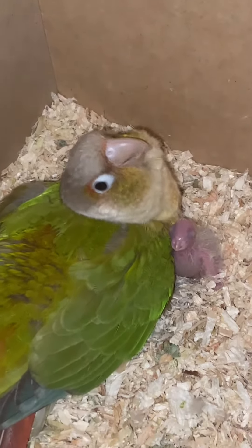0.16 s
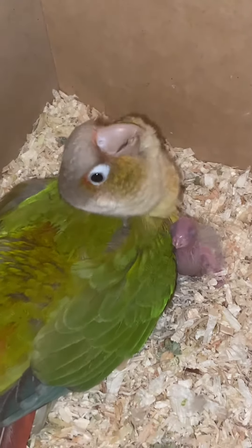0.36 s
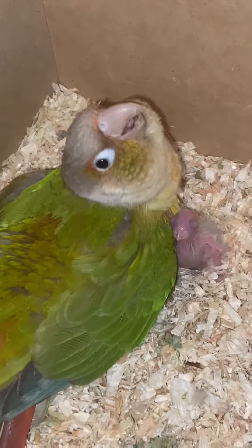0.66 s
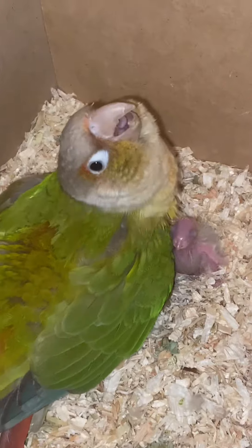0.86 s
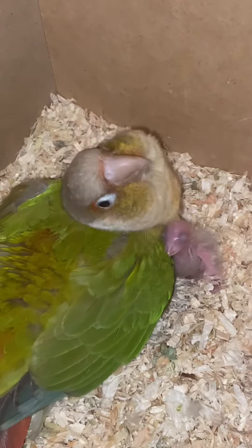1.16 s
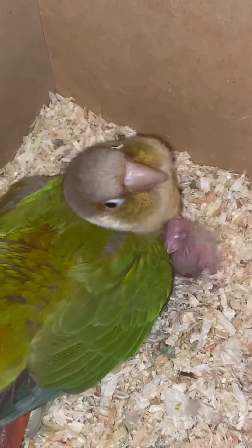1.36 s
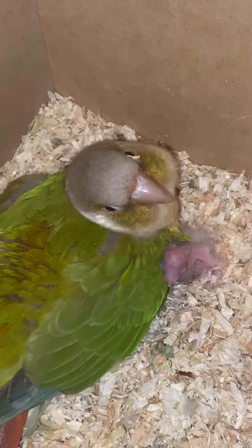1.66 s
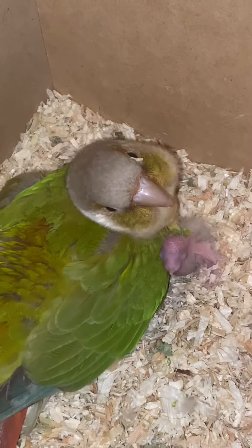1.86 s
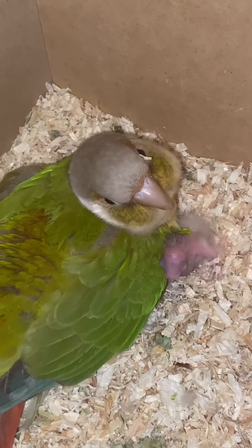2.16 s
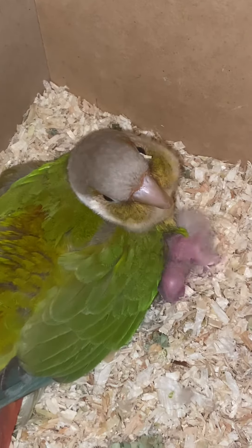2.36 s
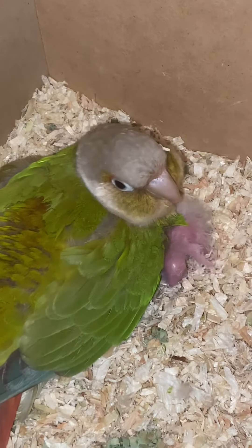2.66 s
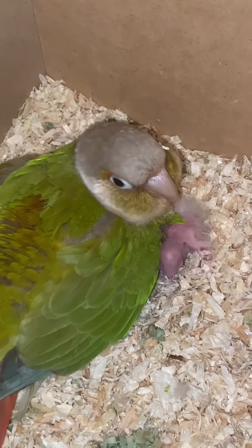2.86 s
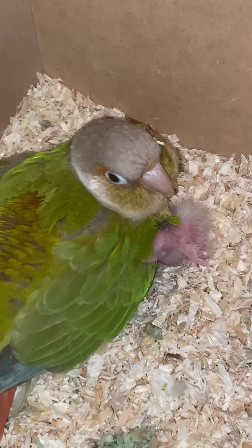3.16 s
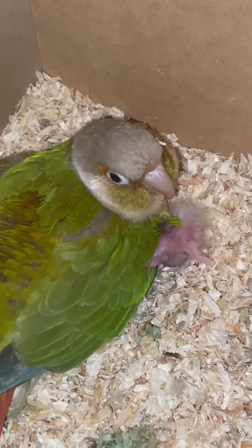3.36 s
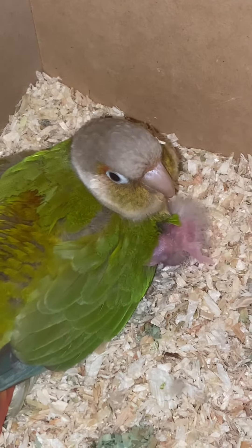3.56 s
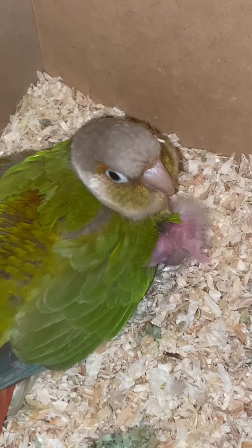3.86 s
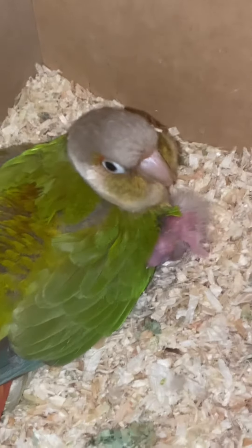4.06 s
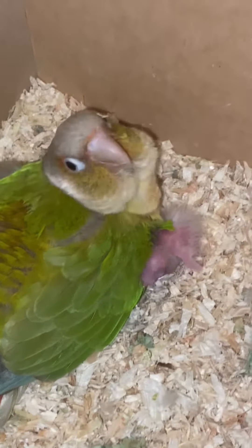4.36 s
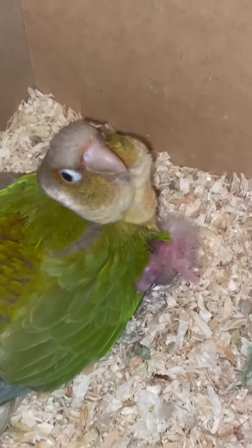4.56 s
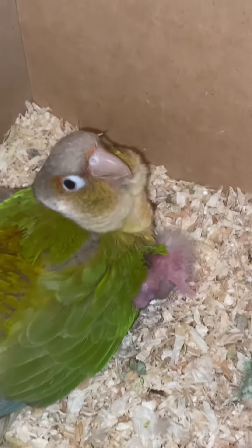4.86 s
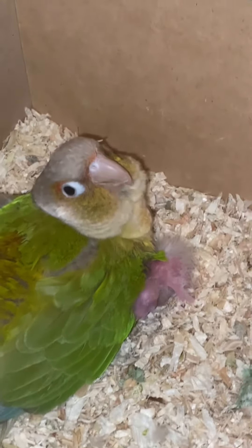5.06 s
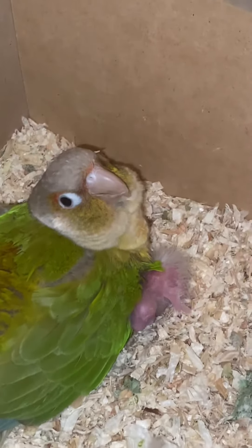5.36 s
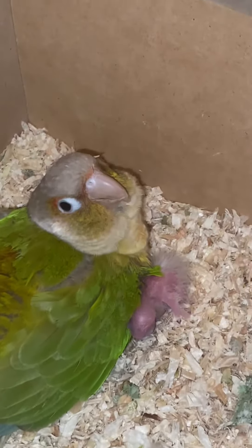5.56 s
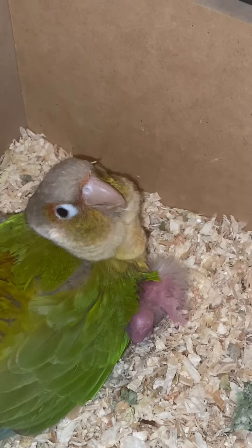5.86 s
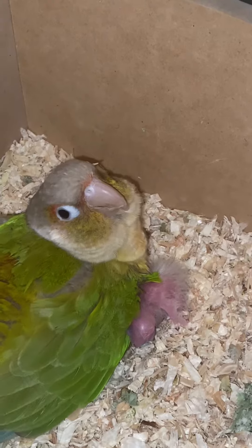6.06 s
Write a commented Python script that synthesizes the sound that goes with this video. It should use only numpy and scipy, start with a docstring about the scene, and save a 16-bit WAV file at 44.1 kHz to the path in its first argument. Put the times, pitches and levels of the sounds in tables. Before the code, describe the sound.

A newly hatched parrot chick gives six short, sharp, raspy peeps about a second apart in a wooden nest box, over faint low rumble.

```python
"""Over a low room rumble a newly hatched parrot chick peeps at once, close and loud, in a wooden nest box;
a second one, muffled under the parent, joins in. Each near peep creaks on, rasps, locks into a whistle and falls.
Noise rustles as shavings, impulses tick in them and ring the wood of the box, and a rattle drives distant metal.
Peeps are whistles with side lines at fractions of their pitch, which double the period or blur into a rasp."""
import sys
import numpy as np
from scipy import signal
from scipy.fft import rfft, irfft
from scipy.io import wavfile
from scipy.ndimage import uniform_filter1d

SR = 44100
rng = np.random.default_rng(int(sys.argv[2]) if len(sys.argv) > 2 else 0)


def dump(signal):
    """Clip the signal to [-1, 1] and save it as 16-bit WAV at the path in sys.argv[1]."""
    limited = np.clip(np.atleast_2d(signal).T, -1, 1)
    pcm = np.round(limited * 32767).astype(np.int16)
    wavfile.write(sys.argv[1], SR, pcm)


def level_to_linear(level):
    """Convert decibel levels to linear amplitude factors, elementwise."""
    exponent = np.asarray(level, float) / 20
    return 10 ** exponent


N = 274302   # samples

# Steady hiss, spectral shape: [f/Hz, relative density/dB]
HISS_SPECTRUM = [(60, -20.5), (130, 1.5), (232, -12.5), (390, -9.5), (550, -18.5), (934, -22), (6000, -36),
                 (16000, -43.5)]
HISS_DB, SIDE_HISS_DB = -73.5, -81   # rms
# Room rumble, before its uneven swell: [t/s, level/dB]
RUMBLE_LEVEL = [(0, -62), (.75, -57.5), (1.1, -63.5), (2.3, -62), (3.1, -69.5), (3.6, -54.5), (4.6, -54),
                (4.85, -42.5), (5.1, -61), (6.22, -69)]

# Distant metal being struck: [t/s, bright drive level/dB, rattle length/s, deep drive level/dB]
CLANKS = [(3.376, -57, 0.0732, -44), (4.121, -45.5, 0.021, -38)]
# Bright modes of the metal: [f/Hz, relative level/dB, t60/s]
METAL_MODES = [(1155, -12, .4), (1700, -4, .2), (1862, 0, .22), (2055, 0, .3), (2290, -3, .8),
               (2600, -7, .15), (3500, -12, .03)]
# Low modes of the same object: [f/Hz, relative level/dB, t60/s]
DEEP_MODES = [(272, -6, .3), (313, 0, .5), (388, -2, .5)]

# Dull knocks on the wood of the box: [t/s, blow level/dB, f/Hz, resonance width/Hz]
KNOCKS = [(0.301, -57, 111.2, 90), (2.206, -60, 410, 200), (4.010, -46, 556, 251.4),
          (4.012, -49.5, 191, 109), (4.036, -43, 99, 110)]
# Rustle of the shavings, spectral shape: [f/Hz, relative density/dB]
RUSTLE_SPECTRUM = [(1000, -8.5), (5000, -2.5), (11000, -5), (16000, -11)]
RUSTLE_DB = -87   # rms, before the box adds its echoes
# Scuffs in the shavings and on the box: [t/s, level/dB, length scale/s, top f/Hz, thump level/dB]
SCUFFS = [(0.293, -60.5, 0.026, 1650, -58), (0.476, -69, 0.072, 1190, -84),
          (1.32, -80.5, 0.21, 9700, -79.5), (1.587, -65.5, 0.012, 675, -63), (1.799, -65, 0.07, 1940, -85),
          (2.134, -75, 0.226, 12000, -80), (2.213, -72.5, 0.054, 670, -72),
          (3.654, -65.5, 0.15, 14300, -79), (3.921, -56.5, 0.093, 2590, -53),
          (3.995, -54, 0.07, 10400, -48), (4.755, -71.5, 0.03, 800, -72)]
# Single shavings snapping: [t/s, impulse level/dB, f/Hz]
TICKS = [(0.527, -52, 1430), (.923, -60.5, 6100), (1.829, -62, 5030), (1.84, -43, 2100),
         (1.996, -55.5, 6100), (3.103, -62.5, 1420)]

BOX_T60_S, BOX_DB = 0.31, -33.5   # ring of the box around the chicks
SWITCH_S = 0.0028   # time in which a voice changes state

# Muffled chick: [start t/s, jump after start/s, length/s, top f/Hz, low stroke level/dB, arch level/dB]
FAR_PEEPS = [(1.157, .041, .101, 5350, -61, -70), (2.424, .053, .105, 5150, -59, -69),
             (3.716, .056, .110, 5300, -61, -70), (5.111, .056, .110, 5600, -61, -72)]
# Its rasp: [cycles after which the motion repeats, smear/Hz]
FAR_RASP = (3, 380)
# Its rasp against the whistle, before the trims in chicks(): [start, low stroke, husky, arch; level/dB]
FAR_RASP_DB = (-28, -8, 3, -15)
# Colour that throat and beak give to its side lines: [f/Hz, level/dB]
FAR_THROAT = [(1200, -42.5), (2000, -3), (4500, 4), (6500, -40.5), (10500, -8), (13000, -46)]
FAR_START_HZ, FAR_LOW_HZ, FAR_HUSKY_HZ, FAR_END_HZ = 2850, 3820, 4150, 2820
FAR_SETTLE_S = 0.0076                        # time constant of the first upward slide
FAR_HUSKY_S, FAR_CREST_S = .018, .010        # husky this long before the jump; crest this long after it
FAR_HUSKY_LOSS_DB = -12                      # reached at the jump
FAR_WARBLE_HZ, FAR_WARBLE_RATE_HZ = 353, 85  # pitch swing while husky
FAR_FLUTTER_DB = 1.5                         # level shake all through the low stroke

# Near chick, pitch arch before scoop and throat pull: [crest t/s, top f/Hz, rise/(Hz/s), fall/(Hz/s)]
NEAR_ARCHES = [(0.144, 5895, 26020, 67460), (1.093, 5973, 30160, 68800), (2.318, 6047, 22870, 86730),
               (3.207, 6321, 36340, 91300), (4.430, 6005, 22860, 83060), (5.572, 6198, 27020, 75830)]
# Its states, levels before the trims in chicks():
# [rasp ends before crest/s, period two ends after crest/s, rasp level/dB, period-two level/dB]
NEAR_STATES = [(0.022, 0.021, -41, -38), (.012, 0.021, -41, -37.5), (0.0038, .023, -45.5, -41),
               (.032, 0.017, -44.5, -38.5), (0.025, 0.024, -45, -42), (.032, 0.03, -46.5, -43)]
# Whistle level of each near peep, before the shake: one list a peep, [t/s, level/dB]
NEAR_LEVEL = [
    [(.084, -48.5), (.102, -30), (.122, -43), (.136, -28), (.147, -28), (.157, -40), (.175, -25),
     (.186, -27), (.205, -56)],
    [(1.032, -51.5), (1.044, -39), (1.070, -43), (1.083, -31), (1.102, -29), (1.110, -41.5), (1.121, -24.5),
     (1.135, -26), (1.153, -54)],
    [(2.262, -54), (2.281, -34.5), (2.309, -27), (2.320, -30), (2.339, -29), (2.347, -45.5), (2.357, -31.5),
     (2.375, -62)],
    [(3.144, -39), (3.160, -29), (3.173, -39), (3.200, -22), (3.226, -34), (3.238, -23), (3.250, -26.5),
     (3.265, -52)],
    [(4.370, -33.5), (4.389, -33), (4.408, -31.5), (4.418, -28), (4.430, -33.5), (4.455, -27), (4.470, -30),
     (4.486, -51.5)],
    [(5.513, -47), (5.533, -32), (5.550, -26.5), (5.570, -26.5), (5.594, -27.5), (5.606, -38.5),
     (5.617, -31.5), (5.635, -62)],
]
# Rasp of each near peep: [cycles after which the motion repeats, smear/Hz]
NEAR_RASP = [(5 / 2, 260), (5 / 2, 240), (3, 110), (5 / 2, 340), (5 / 2, 340), (3, 340)]
# Colour that throat and beak give to its side lines: [f/Hz, level/dB]
NEAR_THROAT = [(900, -26), (2100, -16.5), (3300, -17.5), (4600, -2.5), (6900, 6.5), (9000, -8.5),
               (12000, -14), (16500, -13)]
# Throat pops before each near peep: [base impulse level/dB]
CREAK_DB = [-19.5, -21, -26.5, -16.5, -24.5, -27]
ARCH_KNEE_S = .028   # width of the rounded top
RASP_SWELL_S, RASP_ENTRY_DB = 0.017, -6
RASP_LOCKED_DB, HALF_BEFORE_DB, HALF_AFTER_DB = -66, -62.5, -66   # before the trims in chicks()
SIDE_LINES_UNDER_DB = -9.5                   # most they may reach against the falling whistle, before trims
SCOOP_SHARE, SCOOP_S = .2, .005              # each peep starts this far under its arch and slides up
PULL_HZ, PULL_WIDTH_HZ, PULL_SHARE = 4560, 350, 0.63   # throat resonance holds the passing pitch back
RASP_PITCH_SHAKE, RASP_LEVEL_SHAKE_DB = .045, 5        # the whistle breaks up while it rasps
ROUGHEST_SMEAR_HZ = 340                      # a rasp this smeared shakes the whistle fully

# Phase between the two microphone ports: [f/Hz, left leads right/rad]
PORT_PHASE = [(0, 0), (1550, 0.5), (2500, 0.53), (3530, 0.02), (4480, 1.43), (5170, -1.04), (6460, 3),
              (8180, 4), (9820, 6.5), (11600, 6.5), (12600, 10), (14700, 10), (15300, 12), (16500, 10.5)]


def rms_one(x):
    """Scales a signal to rms 1."""
    return x / np.sqrt(np.mean(x ** 2) + 1e-20)


def spectrum_db(points, hz):
    """Reads a spectrum along a logarithmic frequency axis."""
    at, db = np.transpose(points)
    return np.interp(np.log(hz), np.log(at), db)


def coloured(spectrum):
    """White noise shaped by a spectrum; rms 1."""
    hz = np.fft.rfftfreq(N, 1 / SR) + 1   # keeps the logarithm finite
    gain = level_to_linear(spectrum_db(spectrum, hz))
    return rms_one(irfft(rfft(rng.standard_normal(N)) * gain, N))


def low_pass(x, hz):
    """Second-order low-pass: treble falls away above hz."""
    return signal.sosfilt(signal.butter(2, min(hz, SR / 2.2), fs=SR, output="sos"), x)


def drift(hz):
    """Slow random motion, rms 1, with the filter's first second dropped."""
    return rms_one(low_pass(rng.standard_normal(N + SR), hz)[SR:])


def resonance(x, hz, width_hz):
    """One ringing mode: the narrower, the longer it rings."""
    r = np.exp(-np.pi * width_hz / SR)
    feedback = [1, -2 * r * np.cos(2 * np.pi * hz / SR), r * r]
    return signal.lfilter([(1 - r * r) / 2, 0, (r * r - 1) / 2], feedback, x + 1e-18)


def reverb(x, t60):
    """Dying noise stands for the dense echoes of an enclosure."""
    t = np.arange(SR // 2) / SR
    echoes = rng.standard_normal(len(t)) * level_to_linear(-60 * t / t60) * (t > .002)
    return signal.fftconvolve(x, echoes / np.sqrt(np.sum(echoes ** 2)))[:N]


def burst(s, length, decay_s, rise_s=0.0068):
    """Envelope that swells from s, holds until s + length and then dies exponentially."""
    t = np.arange(N) / SR - s
    return np.clip(t / rise_s, 0, 1) * np.exp(-np.clip(t - length, 0, None) / decay_s)


def hiss():
    """Steady shaped noise in the middle of the image."""
    return level_to_linear(HISS_DB) * coloured(HISS_SPECTRUM)


def side_hiss():
    """Steady shaped noise in opposite polarity left and right, which widens the image."""
    spectrum = [(100, -8.5), (400, -0.5), (1500, -13.5), (2500, -30), (16000, -33.0)]   # f/Hz, density/dB
    return level_to_linear(SIDE_HISS_DB) * coloured(spectrum) * np.array([[1], [-1]])


def rumble():
    """Noise gathered around a deep, narrow resonance, swelling unevenly."""
    s, db = np.transpose(RUMBLE_LEVEL)
    level = np.interp(np.arange(N) / SR, s, db)
    narrow = resonance(rng.standard_normal(N), 69, 12)
    broad = resonance(rng.standard_normal(N), 58, 110)
    deep = resonance(narrow + level_to_linear(-19.0) * broad, 47, 97)
    return level_to_linear(level + 2.0 * drift(2.4)) * rms_one(deep)


def clanks():
    """A short rattle drives the modes of the metal, which ring on."""
    white = rng.standard_normal(N)
    bright, deep = np.zeros(N), np.zeros(N)
    for s, db, length, deep_db in CLANKS:
        bright += white * level_to_linear(db) * burst(s, length, 0.039)
        flutter = 1.2 * drift(10.8)
        deep += white * level_to_linear(deep_db + 14.5 + flutter) * burst(s + 0.018, length, 0.28)
    width = np.log(1000) / np.pi   # resonance width times t60
    modes = sum(level_to_linear(db + 19) * resonance(bright, hz, width / t60) for hz, db, t60 in METAL_MODES)
    modes += sum(level_to_linear(db) * resonance(deep, hz, width / t60) for hz, db, t60 in DEEP_MODES)
    body = resonance(resonance(bright, 1700, 1300), 1700, 1300) + level_to_linear(-18.5) * bright
    return modes + level_to_linear(3.0) * reverb(body, 0.4)


def knocks():
    """A soft blow sets one panel of the box ringing."""
    out = np.zeros(N)
    for s, db, hz, width_hz in KNOCKS:
        blow = np.zeros(N)
        blow[round(s * SR)] = level_to_linear(db) * SR / width_hz
        out += resonance(resonance(blow, hz, width_hz), hz, width_hz)   # twice, for a soft onset
    return out


def rustle():
    """Shaped noise made grainy and patchy by three speeds of random swelling."""
    grains = level_to_linear(1.8 * drift(440) + 3.9 * drift(24) + 0.63 * drift(1))
    return level_to_linear(RUSTLE_DB) * rms_one(coloured(RUSTLE_SPECTRUM) * grains)


def scuffs():
    """Bursts of crumbly noise with a low resonant thump below them."""
    out = np.zeros(N)
    crumbs = level_to_linear(5 * drift(500))
    for s, db, length, top_hz, thump_db in SCUFFS:
        scrape = rms_one(low_pass(crumbs * rng.standard_normal(N), top_hz))
        dull = level_to_linear(db + 2.0 * drift(35)) * scrape
        thump = level_to_linear(thump_db) * rms_one(resonance(low_pass(rng.standard_normal(N), 600), 89.7, 140))
        out += (dull + thump) * burst(s, 0.61 * length, 0.79 * length, rise_s=0.26 * length)
    return out


def ticks():
    """Single shavings snap: an impulse through a broad, quickly dying resonance."""
    out = np.zeros(N)
    for s, db, hz in TICKS:
        snap = np.zeros(N)
        snap[round(s * SR)] = level_to_linear(db) * SR / hz
        out += resonance(resonance(snap, hz, 0.5 * hz), hz, 0.5 * hz)
    return out


def shavings():
    """Rustle and scuffs inside the box, with dry snaps on top."""
    noise = rustle() + scuffs()
    boxed = noise + level_to_linear(-3.5) * reverb(noise, 0.04)   # the box gives the noise narrow standing bands
    return boxed + ticks()


def peep(rows, rasp_rule, throat, octave_db, half_db, rasp_db, breath_db=-32):
    """The membrane whistles, doubles its period, or repeats unevenly after a few cycles."""
    s, *columns = np.transpose(rows)
    t = np.arange(s[0], s[-1], 1 / SR)
    pitch, level, half, rasp = [uniform_filter1d(np.interp(t, s, c), size=130) for c in columns]

    def unsteady(hz):
        """Random motion slower than hz; rms 1."""
        return rms_one(low_pass(low_pass(rng.standard_normal(len(t)), hz), hz))

    phase = 2 * np.pi * np.cumsum(pitch * (1 + .003 * unsteady(400))) / SR

    def line(multiple):
        """A partial at a multiple of the pitch, coloured by the throat."""
        hz = multiple * pitch
        return level_to_linear(spectrum_db(throat, hz)) * (hz < SR / 2.6) * np.exp(1j * multiple * phase)

    out = level_to_linear(.6 * unsteady(200)) * np.exp(1j * phase)
    overtones = level_to_linear(4 * unsteady(90)) * (line(2) + level_to_linear(-16) * line(3))   # they come and go
    out += level_to_linear(octave_db) * overtones
    period_two = level_to_linear(-0.5) * line(1 / 2) + line(3 / 2) + level_to_linear(-4.0) * line(5 / 2)
    out += level_to_linear(half + half_db) * period_two
    # uneven repeats smear every fraction of the pitch into a grainy band
    period, smear_hz = rasp_rule
    slips = level_to_linear(smear_hz / 120 * unsteady(350))
    wander = 2 * np.pi * smear_hz * np.cumsum(unsteady(900)) / SR
    for k in range(1, int(4 * period)):
        wobble = slips * np.exp(1j * np.sqrt(k) * wander) * (k % period > 0)   # spares whole multiples
        air = unsteady(1000) + 1j * unsteady(2100)
        out += line(k / period) * (level_to_linear(rasp + rasp_db) * wobble + level_to_linear(breath_db) * air)
    edge = np.clip(np.minimum(t - t[0], t[-1] - t) / .003, 0, 1)
    return round(s[0] * SR), np.sqrt(2) * level_to_linear(level) * edge * out.real


def far_controls(start, jump, length, top_hz, low_db, arch_db):
    """A low stroke settles, turns husky, then jumps up to an arch that falls as a parabola."""
    t = np.arange(0, length, .001)
    husky, crest = jump - FAR_HUSKY_S, jump + FAR_CREST_S
    low = FAR_LOW_HZ - (FAR_LOW_HZ - FAR_START_HZ) * np.exp(-t / FAR_SETTLE_S)
    shaky = rms_one(uniform_filter1d(rng.standard_normal(200), size=4))[:len(t)]
    warble = FAR_WARBLE_HZ * np.sin(2 * np.pi * FAR_WARBLE_RATE_HZ * t + shaky)
    huskiness = np.interp(t, [husky - SWITCH_S, husky], [0, 1])
    low += huskiness * (FAR_HUSKY_HZ - FAR_LOW_HZ + warble)
    arch = top_hz - (top_hz - FAR_END_HZ) * ((t - crest) / (length - crest)) ** 2
    pitch = np.where(t < jump, low, arch)
    loss = np.interp(t, [husky, jump], [0, FAR_HUSKY_LOSS_DB])
    level = np.where(t < jump, low_db + loss + FAR_FLUTTER_DB * shaky, arch_db)
    first, stroke, rough, clean = FAR_RASP_DB
    turns = [0, FAR_SETTLE_S * 1.5, husky, jump, crest]
    rasp = np.interp(t, turns, [first, stroke, stroke, rough, clean])
    return np.transpose([start + t, pitch, level, rasp, rasp])   # period two follows the rasp


def near_controls(arch, states, level_rows, smear_hz):
    """Rasp until the membrane locks, period two over the crest, a clean whistle on the way down."""
    crest, top_hz, rise, fall = arch
    before, after, rasp_db, half_db = states
    s, db = np.transpose(level_rows)
    t = np.arange(s[0], s[-1], .001)
    level = np.interp(t, s, db)
    slope = np.where(t < crest, rise, fall)
    pitch = top_hz - slope * (np.hypot(t - crest, ARCH_KNEE_S) - ARCH_KNEE_S)
    pitch *= 1 - SCOOP_SHARE * np.exp(-(t - s[0]) / SCOOP_S)
    off = (pitch - PULL_HZ) / PULL_WIDTH_HZ
    pitch -= PULL_SHARE * PULL_WIDTH_HZ * off * np.exp(-off ** 2)
    lock, free = crest - before, crest + after
    looseness = np.interp(t, [lock - SWITCH_S, lock], [1, 0]) * smear_hz / ROUGHEST_SMEAR_HZ
    pitch_shake, level_shake = looseness * rng.standard_normal((2, 200))[:, :len(t)]
    pitch *= 1 + RASP_PITCH_SHAKE * pitch_shake
    level += RASP_LEVEL_SHAKE_DB * level_shake
    # subtracting the whistle level makes both side levels relative to it
    rasp = np.interp(t, [s[0], s[0] + RASP_SWELL_S, lock, lock + SWITCH_S],
                     [rasp_db + RASP_ENTRY_DB, rasp_db, rasp_db, RASP_LOCKED_DB]) - level
    half = np.interp(t, [lock, lock + SWITCH_S, free, free + SWITCH_S],
                     [HALF_BEFORE_DB, half_db, half_db, HALF_AFTER_DB]) - level
    ceiling = np.where(t > free, SIDE_LINES_UNDER_DB, np.inf)
    return np.transpose([t, pitch, level, np.minimum(half, ceiling), np.minimum(rasp, ceiling)])


def creak(first_s=0.011, gap_s=.0032, count=4):
    """Separate pops of the throat, tending to grow, around the start of each near peep."""
    pops = np.zeros(N)
    luck = rng.standard_normal((len(NEAR_LEVEL), count, 2))
    for rows, db, chance in zip(NEAR_LEVEL, CREAK_DB, luck):
        for k, (shift, strong) in enumerate(chance):
            at = rows[0][0] - first_s + gap_s * (k + .15 * shift)
            pops[round(at * SR)] = level_to_linear(db + 0.91 * k + 2.5 * strong)
    throat = [(4200, 6.0), (7300, -12.5)]   # f/Hz, level/dB
    return sum(level_to_linear(db) * resonance(resonance(pops, hz, 1300), hz, 1300) for hz, db in throat)


def chicks():
    """Both chicks, with the short ring of the box around them."""
    out = creak()
    peeps = []
    for row in FAR_PEEPS:
        controls = far_controls(*row)
        peeps.append(peep(controls, FAR_RASP, FAR_THROAT, octave_db=5.5, half_db=-3.5, rasp_db=0.5))
    for arch, states, level_rows, rule in zip(NEAR_ARCHES, NEAR_STATES, NEAR_LEVEL, NEAR_RASP):
        controls = near_controls(arch, states, level_rows, rule[1])
        peeps.append(peep(controls, rule, NEAR_THROAT, octave_db=-6.5, half_db=4.5, rasp_db=5.5))
    for at, sound in peeps:
        out[at:at + len(sound)] += sound
    return out + level_to_linear(BOX_DB) * reverb(out, BOX_T60_S)


def scene():
    """Every source in the middle, with the side hiss spread around it."""
    middle = hiss() + rumble() + clanks() + knocks() + shavings() + chicks()
    return middle + side_hiss()


def top_cut(x):
    """Nothing passes above the cut-off."""
    return signal.sosfilt(signal.butter(12, 17000, fs=SR, output="sos"), x)


def record(dry):
    """The two microphone ports drift out of phase towards the treble; the top is cut."""
    lead = np.interp(np.fft.rfftfreq(N, 1 / SR), *np.transpose(PORT_PHASE))
    turn = np.exp(.5j * lead * np.array([[1], [-1]]))   # half the lead to each side
    ports = irfft(rfft(dry) * turn, N)
    finished = signal.sosfilt(signal.cheby2(12, 60, 16600, fs=SR, output="sos"), ports)
    return top_cut(finished)


dry = scene()
out = record(dry)
dump(out)
```